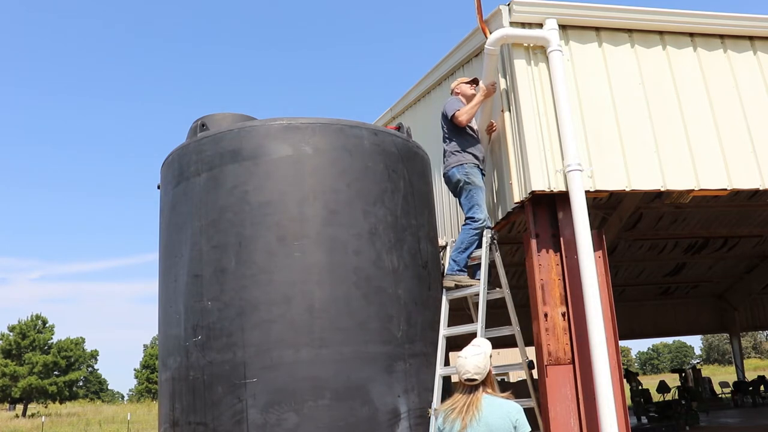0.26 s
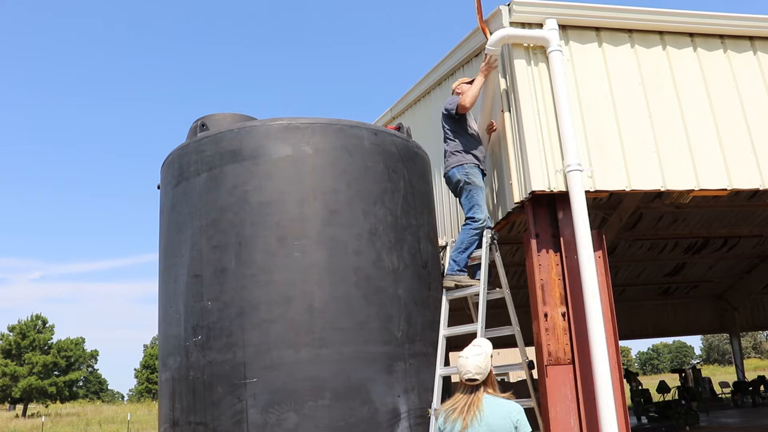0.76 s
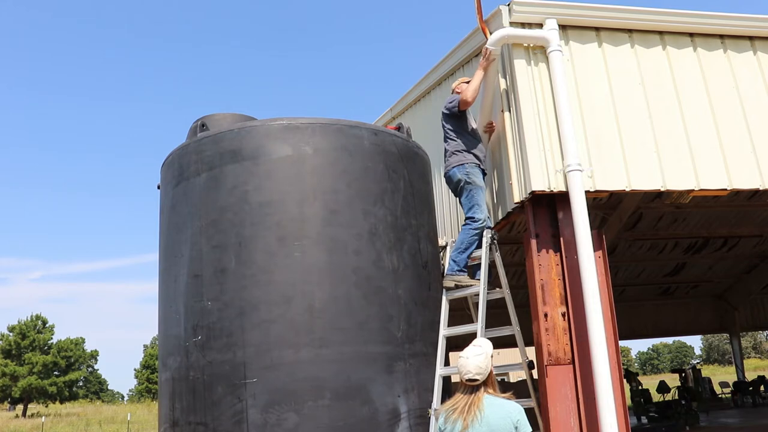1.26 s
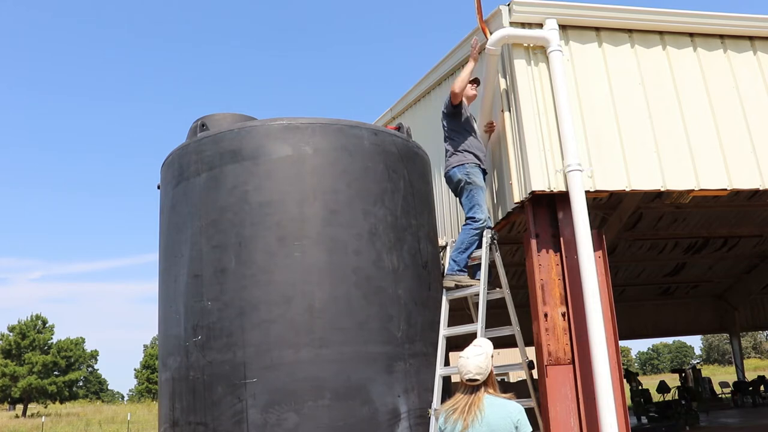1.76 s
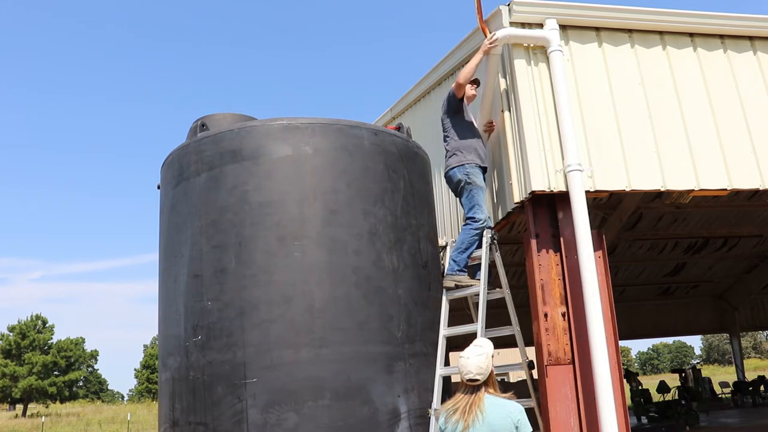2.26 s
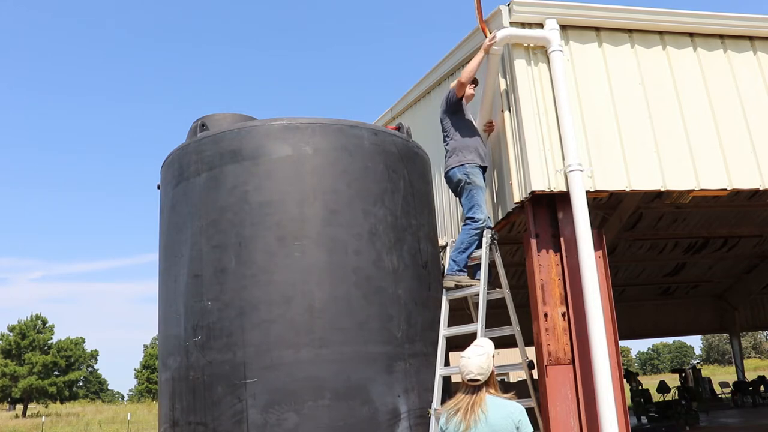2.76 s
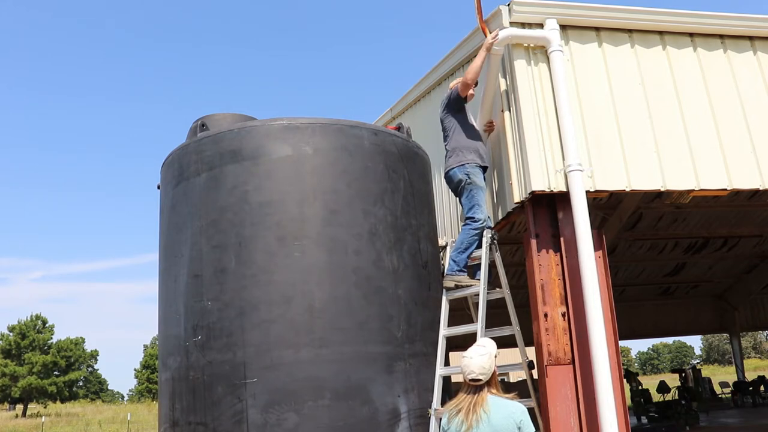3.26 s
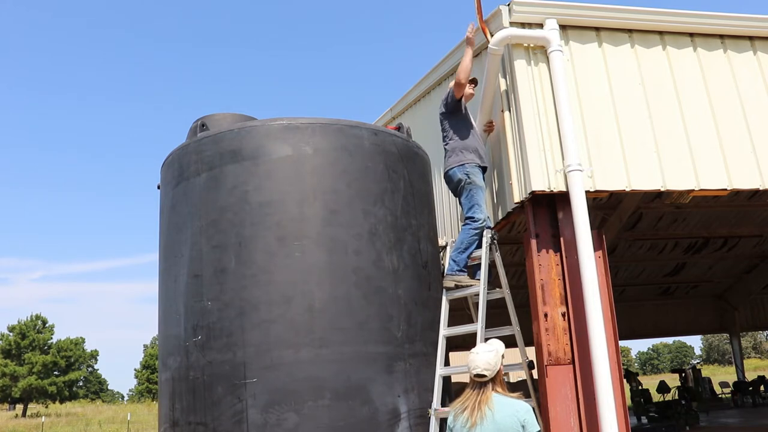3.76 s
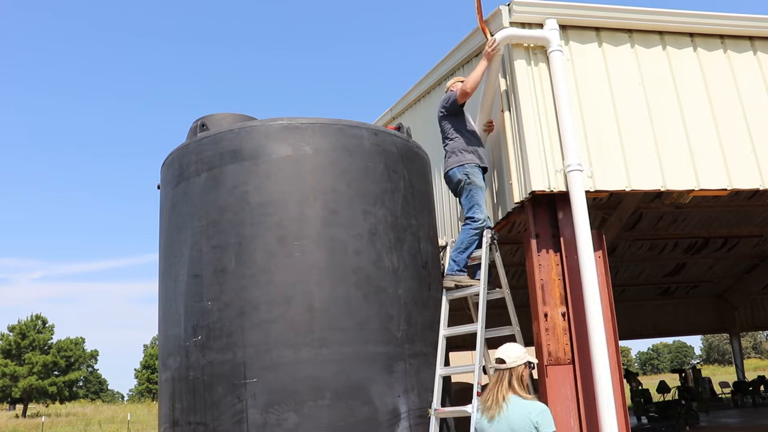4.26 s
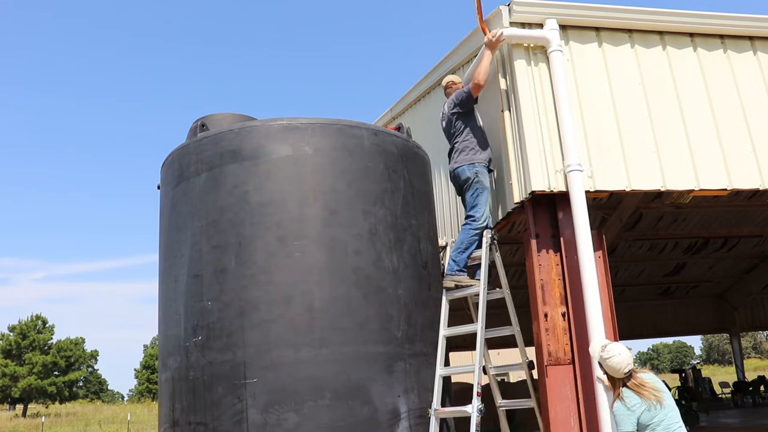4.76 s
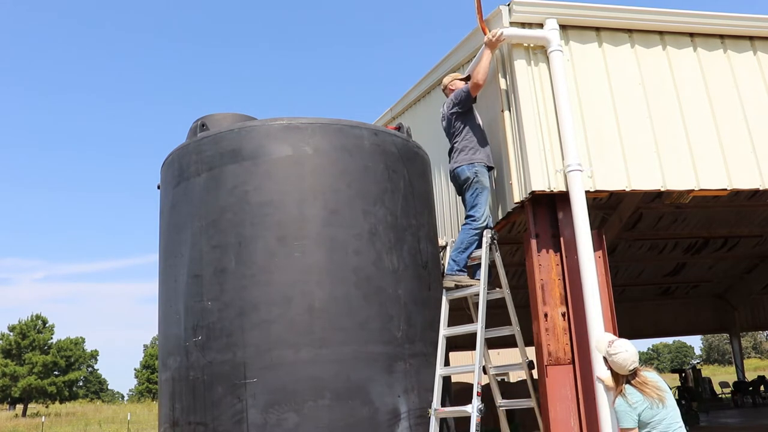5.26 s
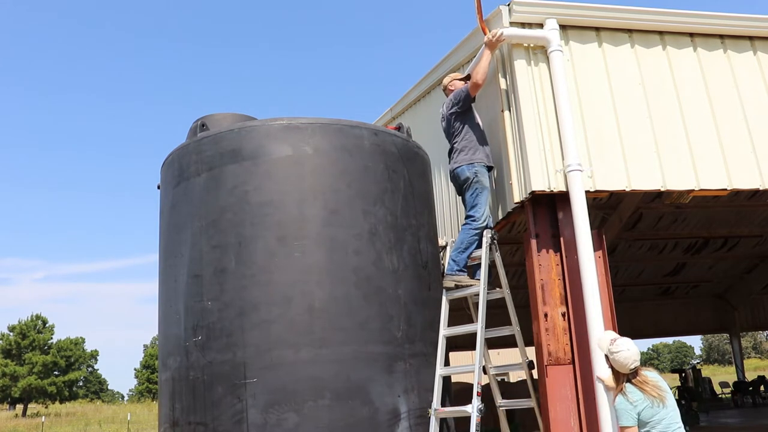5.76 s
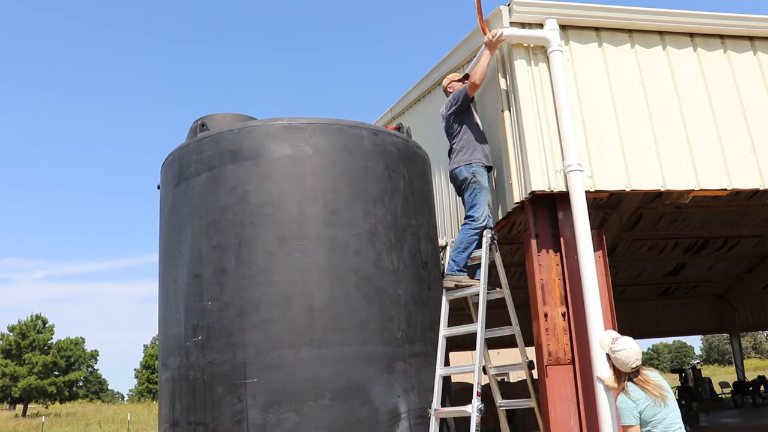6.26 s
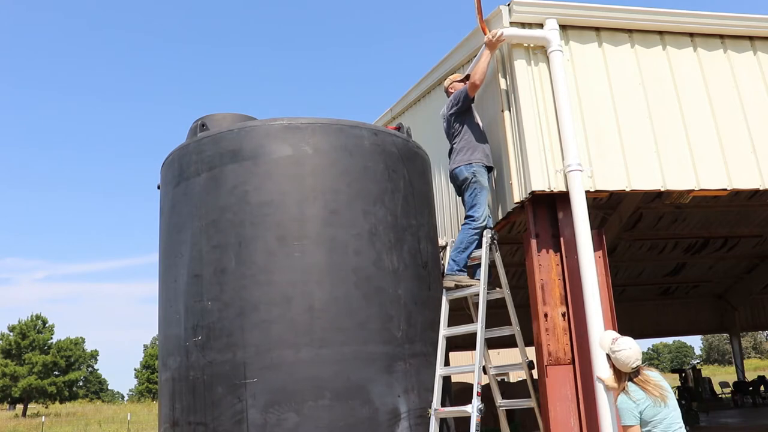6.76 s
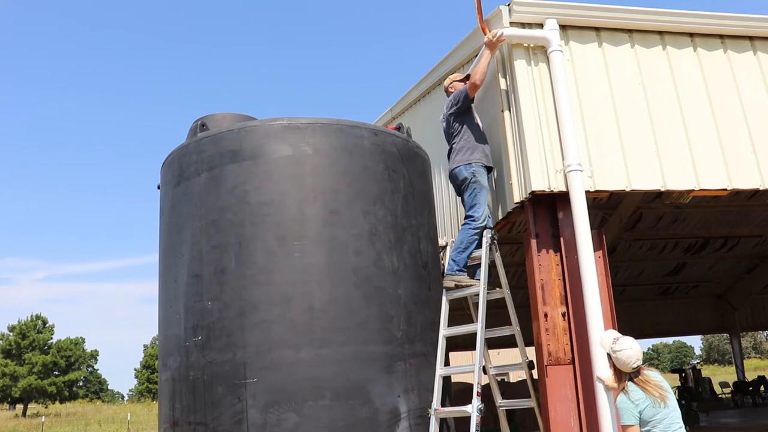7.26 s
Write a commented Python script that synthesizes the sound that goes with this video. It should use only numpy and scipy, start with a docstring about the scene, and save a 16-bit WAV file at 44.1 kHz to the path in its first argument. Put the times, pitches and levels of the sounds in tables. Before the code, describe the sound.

Outdoors beside a metal-clad barn, a plastic downspout is lightly tapped and handled, then struck with four hard, sharp, hollow knocks about 0.6 seconds apart. The sheet wall slaps and booms and loose pipe chatters. A faint knock, a dull thud and a late low thump follow, over quiet field hush and low wind on a single microphone.

```python
"""Downspout knocked home beside a steel barn

Outdoors, one microphone: a man on a ladder drives a plastic downspout into its fitting with four hard
blows, then three duller ones. Each hard blow is a click, a noisy crack and a hollow ring of decaying modes.
The pipe bumps the sheet-metal wall, which slaps and booms; loose plastic rattles in its brackets.
Taps, hand rubs and one hollow air note come between, as shaped noise and modes.
Behind them, low noise swells as wind buffets the microphone, over the steady hush of a quiet field."""
import sys
import numpy as np
from scipy import signal
from scipy.fft import rfft, irfft, next_fast_len
from scipy.io import wavfile
from scipy.ndimage import uniform_filter1d

SR = 44100
rng = np.random.default_rng(int(sys.argv[2]) if len(sys.argv) > 2 else 0)


def generate_wav(signal):
    """Clip the signal to [-1, 1] and save it as 16-bit WAV at the path in sys.argv[1]."""
    frames = np.transpose(np.atleast_2d(signal))
    scaled = np.clip(frames, -1, 1) * 32767
    pcm = np.round(scaled).astype(np.int16)
    wavfile.write(sys.argv[1], SR, pcm)


N = 331615  # length of the scene, samples
T = np.arange(2 ** 16) / SR  # time axis of a single event, s

# Blows on the pipe: [t/s, level/dB, contact cut-off f/Hz, hollowness/dB, click level/dB, yard level/dB,
# crack time to 1/e /s]; click and yard are relative to the blow
KNOCKS = [(2.013, -3.5, 18000, 5.5, -20, -23, .0062), (2.6377, -5.5, 20300, -4, 0.5, -19.5, 0.011),
          (3.2327, -8, 20000, 9, -2.5, -21, 0.0062), (3.9583, -2.5, 20000, -0.5, 2, -19, 0.0092),
          (4.34, -23.5, 6700, 16, -11, -26, .013), (5.0024, -18, 850, 2.5, -20, -28, 0.0078),
          (6.9046, -11, 699, 0.5, -8, -30, 0.018)]
# A hollow blow favours the main pipe resonances over the gap between: [f/Hz, share of hollowness]
HOLLOW_SHARES = [(600, 0.072), (1500, 0.56), (3000, -0.62), (4500, 0.17)]
# Ring of the pipe: [f/Hz, relative level/dB, t60/s]
PIPE_MODES = [(185.4, -31.5, 0.45), (494, -9.5, 0.017), (687.6, -0.5, 0.067), (1144, 0.5, 0.032),
              (1285, 2.5, 0.064), (1454, -3, 0.079), (1667, -2.5, 0.05), (1818, 3, 0.04), (2057, 8, 0.034),
              (3710, 3, 0.025), (4240, 6, 0.026), (4700, -0.5, 0.042), (5385, 4.5, 0.022), (6590, 1.5, .03)]
# Relative colour of the crack of the pipe: [f/Hz, level/dB]
CRACK_COLOUR = [(60, -31), (160, 1.5), (400, 1.5), (1300, 6.5), (2100, 7.5), (2700, 1.5), (5000, 3.5),
                (7500, -3.5), (9300, -15), (10200, -37), (15000, -24)]
# Relative colour of the answer from the yard: [f/Hz, level/dB]
YARD_COLOUR = [(60, -6.5), (150, 7), (400, 7.5), (1000, 2), (2000, -4), (3000, -9), (6500, -8),
               (8500, -15.5), (11000, -20), (15000, -19.5)]
# The pipe bumps the wall: [t/s, force/dB, favoured f/Hz, treble tilt/dB]
WALL_BUMPS = [(1.399, -43, 900, 2.5), (1.44, -34.5, 420, -15.5), (2.047, -15, 790, -20),
              (2.6621, -12.5, 515, -4.5), (2.717, -27, 510, -4.5), (3.2465, -9, 880, -5),
              (3.284, -20.5, 476, -5.5), (3.344, -24, 943, -1), (3.396, -19, 872, -17.5),
              (3.444, -29, 1456, 3), (4.062, -22.5, 600, 1), (4.076, -15.5, 310, -12),
              (4.1214, -19, 895, -3), (4.189, -37.5, 260, -0.5), (4.712, -39.5, 400, -4)]
# Ring of the wall panels: [f/Hz, relative level/dB, t60/s]
WALL_MODES = [(73.5, -16, 3.3), (79, -21, 2.2), (142, -11.5, 1), (183.2, -11.5, 1.07), (252, -4.5, 0.41),
              (283, -10.5, 0.85), (428.5, -0.5, 0.35), (461, -9.5, 0.83), (619, -2.5, 0.33),
              (660, -2.5, 0.24), (810, -3.5, 0.19), (974, -6.5, 0.24), (1125, -10, 0.4), (1260, -24, 0.73)]
# Relative colour of the slap on sheet metal: [f/Hz, level/dB]
SLAP_COLOUR = [(80, -37), (250, -14.5), (450, 3), (900, -3), (1700, -5.5), (3000, -13.5), (8000, -28),
               (15000, -43)]
# Relative colour of the dense wall boom: [f/Hz, level/dB]
BOOM_COLOUR = [(45, -13), (100, -0.5), (170, 11.5), (400, 6.5), (700, -0.5), (1600, -6), (3000, -10.5),
               (6500, -24.5), (10000, -23), (15000, -49.5)]
# Ring-out of wall and yard by band: [f/Hz, t60/s]
RING_OUT = [(80, 1.14), (200, 1.09), (500, 0.7), (1500, 0.73), (4000, 0.51), (8000, 0.21), (15000, 0.07)]
# Light taps and ticks of the pipe in its fittings: [t/s, level/dB, favoured f/Hz]
PIPE_TAPS = [(.014, -34.5, 610), (0.09, -36, 2330), (.179, -33, 610), (0.342, -39.5, 1470),
             (0.894, -30, 1730), (3.158, -37.5, 681), (3.227, -16.5, 2960), (3.4938, -39, 2400),
             (3.608, -34, 2044), (5.009, -28.5, 485), (5.83, -46, 1410), (6.569, -39, 1120),
             (6.913, -28, 420)]
# Relative colour of a tap: [f/Hz, level/dB]
TAP_COLOUR = [(80, -13.5), (300, 15.5), (550, 12.5), (800, 10.5), (1200, 3), (1900, -14), (2800, 2),
              (4500, -33), (9000, -7), (15000, -73)]
# Soft pushes on the open pipe sound its air column: [t/s, level/dB, f/Hz, t60/s]
AIR_THUMPS = [(.006, -22.5, 177, 0.21)]
# The loose pipe chatters in its brackets: [start t/s, end t/s, level of the weakest bounce/dB]
BRACKET_RATTLES = [(0.242, 0.411, -58.5), (3.256, 3.348, -40), (3.39, 3.434, -38.5), (4.068, 4.154, -35)]
# A hand slides along the pipe: [fastest at t/s, level/dB, rise from 1/e /s, fall to 1/e /s]
HAND_RUBS = [(.76, -54, 0.19, 0.15), (1.17, -59, .08, 0.068), (4.682, -47.5, 0.3, 0.037),
             (6.2, -54.5, 0.23, 0.12)]
# Relative colour of skin on plastic: [f/Hz, level/dB]
RUB_COLOUR = [(500, -12.5), (1300, -7), (1900, -4), (2700, -4.5), (4300, -1.5), (6500, -7), (8400, -2),
              (10000, -11), (15000, -22)]
# Gusts on the microphone: [middle t/s, length between 1/e points/s, level/dB]
WIND_GUSTS = [(0.207, 0.2, -42), (0.59, 0.38, -43), (1.428, 0.33, -51), (3.5, 3.64, -59),
              (5.426, 0.67, -51), (6.215, 0.29, -47), (6.746, 0.73, -52)]
# Relative colour of wind on the microphone: [f/Hz, level/dB]
WIND_COLOUR = [(15, -3), (42, 0.5), (90, -6), (160, -11), (300, -25), (800, -49.5)]
# Relative colour of the quiet field: [f/Hz, level/dB]
FIELD_COLOUR = [(59, -26), (100, -7), (253, -14), (281, -15.5), (627, -12.5), (1660, -22), (4660, -26.5),
                (15500, -32)]

SOFT_FLOOR_DB = -45  # treble that even the softest contact lets through
SLAP_RISE_S, SLAP_HOLD_S, SLAP_T60_S = 0.0015, 0.0062, 0.06
BOOM_DB, BOOM_GROWTH = -20, 0.65  # boom of a 0 dB bump; dB of boom per dB of force
BREEZE_DB, GUST_FLATNESS = -64.5, 2  # breeze between gusts; how level the top of a gust is
FLUTTER_DB, FLUTTER_PER_S = 2, 14
FIELD_DB = -54.5
TOP_HZ = 15800  # top of the recorder's range


def knocks():
    """The pipe jumps in its socket: a click, a burst of chatter, a hollow ring, and the yard's answer."""
    out = np.zeros(N)
    hz = np.geomspace(100, 16000, 40)
    click_colour = [(500, -14), (4000, -9.5), (9000, -4.5), (15000, -21.5)]
    for s, db, cutoff_hz, hollow_db, click_db, yard_db, length_s in KNOCKS:
        click = undb(click_db) * noise(click_colour, len(T)) * fade(0.0076)
        # the chatter holds for a few milliseconds and stops as the joint seats
        chatter_shape = np.exp(-(T / length_s) ** 2)
        crack = undb(-5.5) * grit(CRACK_COLOUR, len(T), spread_db=6.5) * chatter_shape
        pipe = undb(-13) * ring(PIPE_MODES, detune=0.0037)
        direct = echo(click + crack + pipe, lag_s=0.0075, db=-15.5)
        blow = direct + undb(yard_db - 1) * tail(YARD_COLOUR, swell_s=0.011)
        # a soft contact loses 12 dB an octave above its cut-off
        contact_db = np.maximum(-10 * np.log10(1 + (hz / cutoff_hz) ** 4), SOFT_FLOOR_DB)
        hollowness_db = hollow_db * on_log(hz, HOLLOW_SHARES)
        add(out, s, colour(blow, np.c_[hz, db + contact_db + hollowness_db]))
    return out


def bumps():
    """The sheet wall slaps, then booms; slap grows faster with force, each spot favours its own pitch."""
    out = np.zeros(N)
    slap_fall = np.exp(-np.log(1000) * np.maximum(T - SLAP_HOLD_S, 0) / SLAP_T60_S)
    contact = (1 - np.exp(-T / SLAP_RISE_S)) * slap_fall
    for s, force_db, centre_hz, treble_db in WALL_BUMPS:
        slap = undb(force_db) * noise(SLAP_COLOUR, len(T)) * contact
        panels = undb(3.5) * ring(WALL_MODES, detune=0.0059) * (1 - np.exp(-T / 0.00434))
        boom = panels + tail(BOOM_COLOUR, swell_s=0.0058)
        boom_gain = undb(BOOM_DB + BOOM_GROWTH * force_db)
        spot = [(centre_hz / 2, -3), (centre_hz, 2), (centre_hz * 2, treble_db / 2), (8000, treble_db)]
        add(out, s, colour(slap + boom_gain * boom, spot))
    return out


def taps():
    """Small contacts wake the pipe in one broad band each, with a faint boom behind."""
    out = np.zeros(N)
    for s, db, centre_hz in PIPE_TAPS:
        tick = noise(TAP_COLOUR, len(T)) * fade(0.13) + undb(-14) * ring(PIPE_MODES, detune=0.023)
        tap = echo(tick, lag_s=0.006, db=-7) + undb(-15.5) * tail(BOOM_COLOUR, swell_s=0.0033)
        band = [(centre_hz / 3, -9), (centre_hz, 3), (centre_hz * 2, -5), (centre_hz * 6, -14)]
        add(out, s, colour(undb(db) * tap, band))
    return out


def thumps():
    """The air in the pipe gives one round, hollow note: a decaying sine with a soft onset."""
    out = np.zeros(N)
    for s, db, hz, t60 in AIR_THUMPS:
        note = ring([(hz, db, t60)], detune=0.003)
        add(out, s, note * (1 - np.exp(-T / 0.012)))
    return out


def rattles():
    """Quick uneven bounces of plastic on metal, each a tiny clack with a short hollow ring."""
    out = np.zeros(N)
    count = 10  # bounces in each rattle
    size = len(T) // 10
    for start, end, db in BRACKET_RATTLES:
        for k, (late, force) in enumerate(rng.random((count, 2))):
            clack = noise(CRACK_COLOUR, size) * fade(0.034)[:size]
            pipe = undb(-12.5) * ring(PIPE_MODES, detune=0.013)[:size]
            s = start + (end - start) * (k + late) / count
            add(out, s, undb(db + 10 * force) * (clack + pipe))
    return colour(out, [(400, 4.5), (1200, 8), (2100, -0.5), (3500, -9.5), (12000, -19)])


def rubs():
    """Skin sliding on plastic: a soft, slightly uneven hiss that follows the speed of the hand."""
    speed = np.zeros(N)
    for s, db, rise_s, fall_s in HAND_RUBS:
        speed += undb(db) * hump(s, rise_s, fall_s, flatness=2)
    return noise(RUB_COLOUR, N) * speed * undb(1.9 * walk(60))


def wind():
    """Gusts swell out of a light breeze and flutter on the microphone as low noise."""
    flow = np.full(N, undb(BREEZE_DB))
    for s, length_s, db in WIND_GUSTS:
        flow += undb(db) * hump(s, length_s / 2, length_s / 2, GUST_FLATNESS)
    flutter = undb(FLUTTER_DB * walk(FLUTTER_PER_S))
    return noise(WIND_COLOUR, N) * flow * flutter


def field():
    """The hush of the quiet field: coloured noise whose level wanders very slightly."""
    return noise(FIELD_COLOUR, N) * undb(FIELD_DB + 0.6 * walk(3.004))


def ring(modes, detune):
    """Modes that fall 60 dB in their t60; pitch and phase land a little differently each time."""
    out = np.zeros(len(T))
    draws = rng.standard_normal((len(modes), 2))
    for (hz, db, t60), (shift, phase) in zip(modes, draws):
        t = T[:int(t60 * SR)]
        cycles = hz * (1 + detune * shift) * t + phase
        out[:len(t)] += undb(db - 60 * t / t60) * np.sin(2 * np.pi * cycles)
    return out


def tail(points, swell_s):
    """Dense panel modes and echoes, in clumps: the bass builds up later and has its own ring-out."""
    spectrum = rfft(noise(points, len(T)))
    hz = np.arange(len(spectrum)) * SR / len(T)
    centres = np.array(RING_OUT)[:, 0]
    place = on_log(hz, np.c_[centres, np.arange(len(centres))])
    out = np.zeros(len(T))
    for k, (centre, t60) in enumerate(RING_OUT):
        # overlapping triangular bands that sum to the whole spectrum
        band = irfft(spectrum * np.maximum(1 - abs(place - k), 0), len(T))
        swell = 1 - np.exp(-T / (swell_s * np.sqrt(500 / centre)))
        out += band * fade(t60) * swell
    return out * undb(2.34 * walk(110, size=len(T)))


def echo(x, lag_s, db):
    """Add one reflection off a nearby surface."""
    delayed = np.pad(x, (int(lag_s * SR), 0))[:len(x)]
    return x + undb(db) * delayed


def grit(points, size, spread_db):
    """Coloured noise of rms 1 made of tiny contacts of very unequal force."""
    force = undb(spread_db * np.clip(rng.standard_normal(size), -2, 2))
    return unit(colour(rng.choice([-1, 1], size) * force, points))


def noise(points, size):
    """Coloured noise of rms 1."""
    return unit(colour(rng.standard_normal(size), points))


def colour(x, points):
    """Causal minimum-phase filter with the gain of (Hz, dB) points."""
    size = 2 * next_fast_len(len(x) // 2 + 1)
    hz = np.arange(size // 2 + 1) * SR / size
    cepstrum = irfft(np.log(undb(on_log(hz, points))))
    # fold the cepstrum onto positive time, so nothing sounds before its cause
    cepstrum[1:size // 2] *= 2
    cepstrum[size // 2 + 1:] = 0
    return irfft(rfft(x, size) * np.exp(rfft(cepstrum)))[:len(x)]


def hump(s, rise_s, fall_s, flatness):
    """A smooth swell that peaks at time s."""
    late = np.arange(N) / SR - s
    return np.exp(-np.maximum(-late / rise_s, late / fall_s) ** flatness)


def walk(rate, size=N):
    """Random wander with a spread near 1, from smoothed steps at the given rate per second."""
    hold = int(SR / rate)
    steps = np.repeat(rng.standard_normal(size // hold + 1), hold)
    return unit(uniform_filter1d(steps, hold)[:size])


def fade(t60):
    """Exponential decay, 60 dB down after t60 seconds."""
    return np.exp(-np.log(1000) * T / t60)


def on_log(hz, points):
    """Read (Hz, value) points on a log-frequency axis."""
    f, value = np.transpose(points)
    return np.interp(np.log(np.maximum(hz, 1)), np.log(f), value)


def undb(db):
    """Decibels to gain."""
    return 10 ** (np.asarray(db) / 20)


def unit(x):
    """Scale to rms 1."""
    return x / np.sqrt(np.mean(x ** 2))


def add(track, s, sound):
    """Mix a sound into a track at time s."""
    start = max(int(s * SR), 0)
    track[start:start + len(sound)] += sound[:N - start]


def scene():
    """Pipe, wall, hand, wind and field summed at one microphone."""
    pipe_and_wall = knocks() + bumps() + taps() + thumps() + rattles()
    return (pipe_and_wall + rubs() + wind() + field())[None]


def record(dry):
    """The recorder rounds the loudest peaks, then cuts the top with a steep low-pass."""
    low_pass = signal.ellip(10, 0.2, 80, TOP_HZ, fs=SR, output="sos")
    return signal.sosfilt(low_pass, np.tanh(dry))


dry = scene()
out = record(dry)
generate_wav(out)
```